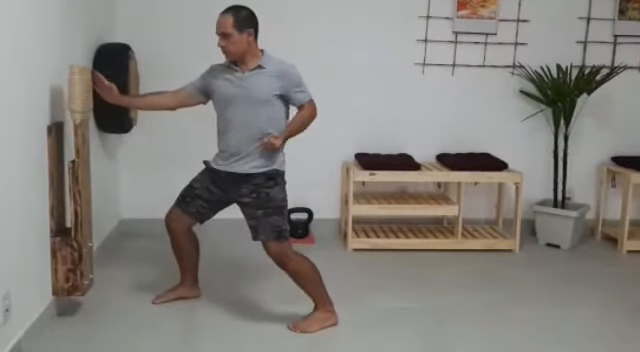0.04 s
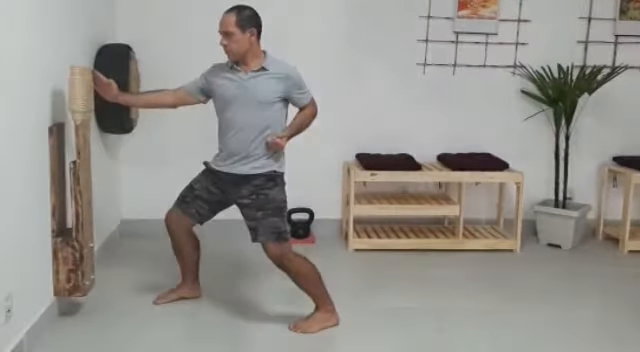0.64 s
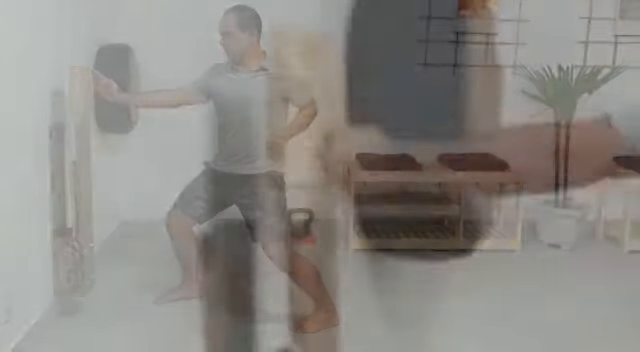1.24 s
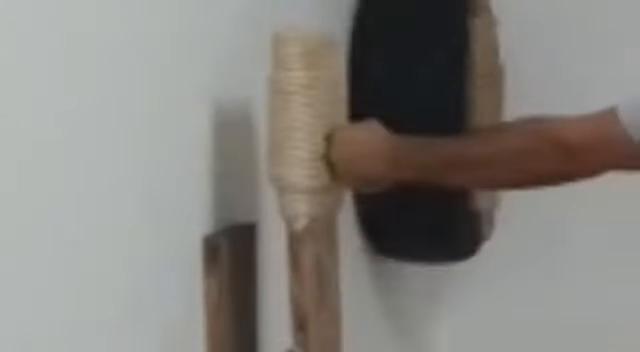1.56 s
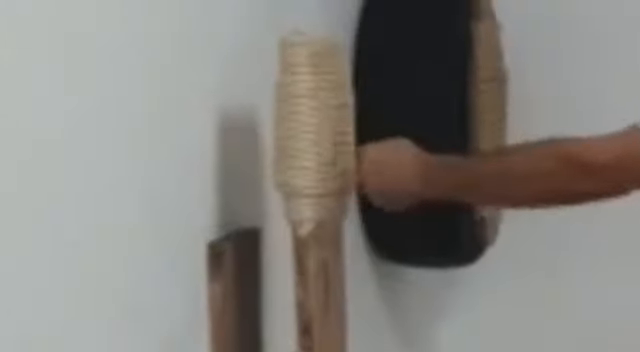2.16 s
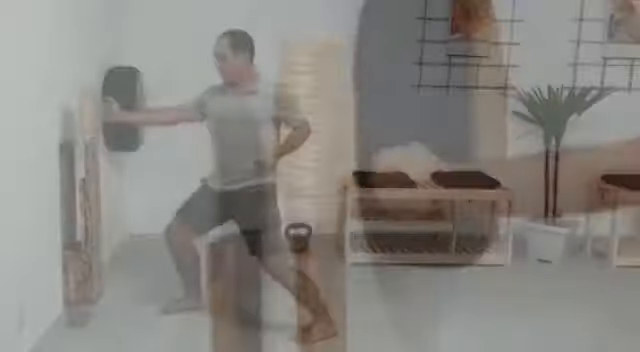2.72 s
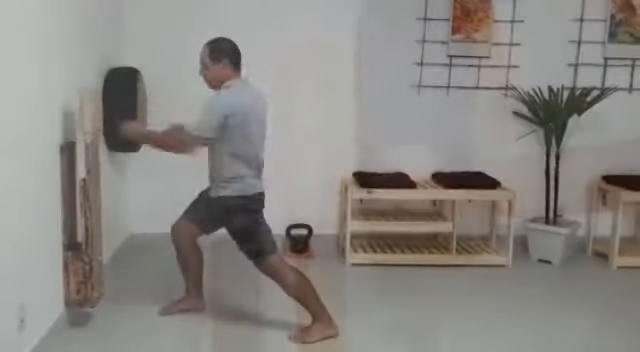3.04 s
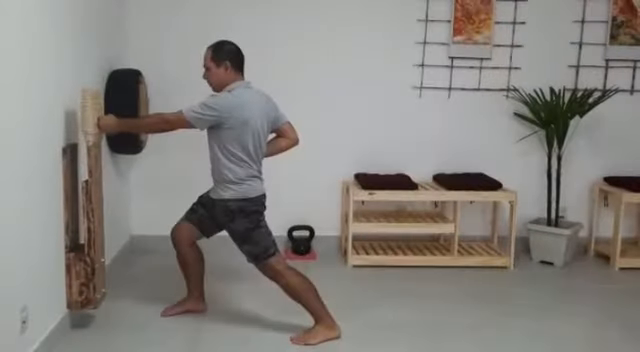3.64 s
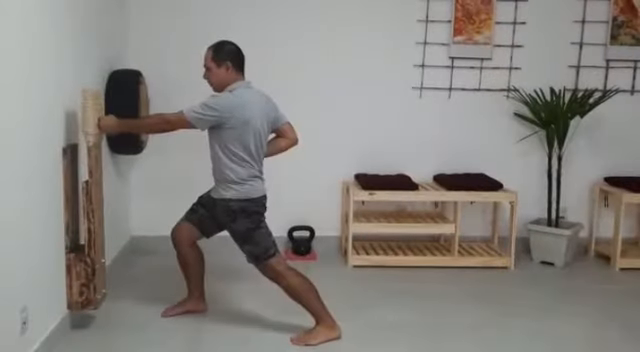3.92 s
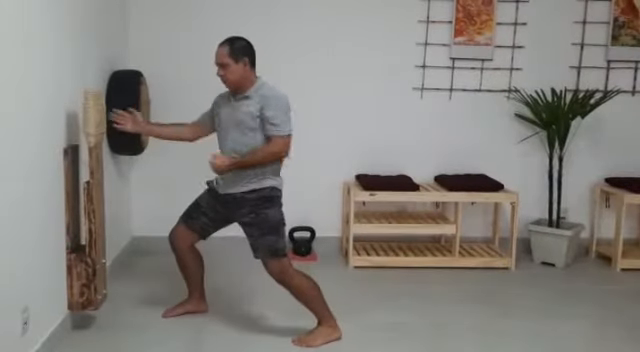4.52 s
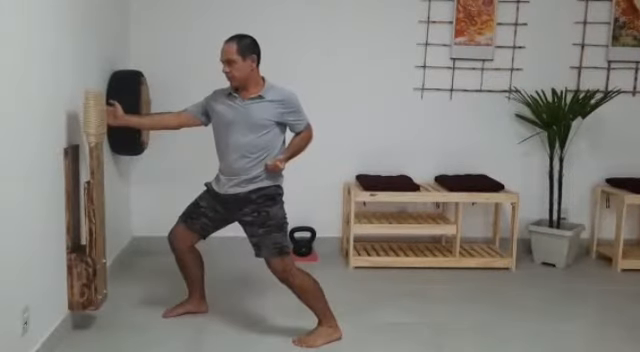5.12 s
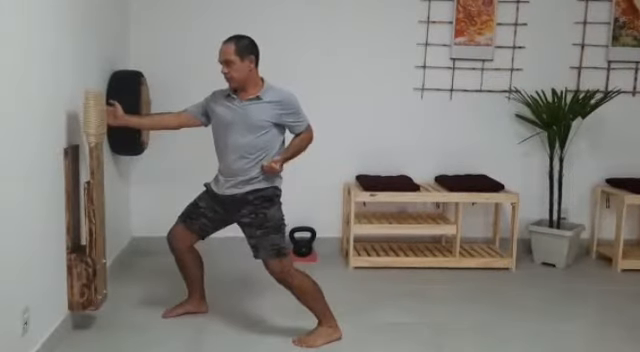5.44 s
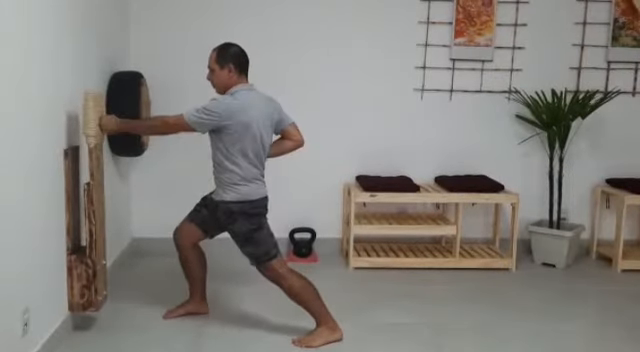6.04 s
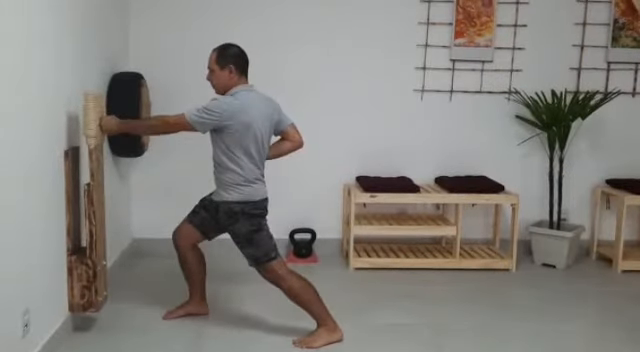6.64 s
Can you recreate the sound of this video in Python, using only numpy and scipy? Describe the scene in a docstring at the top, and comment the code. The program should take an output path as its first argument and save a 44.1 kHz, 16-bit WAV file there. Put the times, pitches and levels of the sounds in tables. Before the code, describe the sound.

Over a steady indoor rumble and appliance hum, the tail of an earlier blow fades. Three separate punches land on a rope-wound wooden post, each a sharp smack and knock followed by a deep, wavering ring from the room. Between the second and third come a light pat and soft shifts of weight, with faint clothing rustle. The microphone hears it all with a wide, long echo.

```python
"""A low boom dies away in a hard, echoing room, over rustling cloth and a steady rumble and hum.
Then a bare fist strikes a rope-wound wooden post: skin slaps the rope, the wood knocks, and the low
modes of post, wall and room boom and beat. One punch is heard twice, first as a replay that fades in
and out, then in its place. A light pat of the palm and soft shifts of weight precede the last punch."""
import sys
import numpy as np
from scipy import signal
from scipy.fft import rfft, irfft, next_fast_len
from scipy.io import wavfile

SR = 44100
rng = np.random.default_rng(int(sys.argv[2]) if len(sys.argv) > 2 else 0)


def transcribe(u):
    """Save the signal u as a 16-bit wav file named by the first command-line argument.

    u: samples, shape (n,) or (channels, n), limited to [-1, 1]; the rate is SR.
    q: integer samples, one column per channel.
    """
    v = np.clip(np.atleast_2d(u).T, -1, 1)
    q = np.round(v * 32767).astype(np.int16)
    wavfile.write(sys.argv[1], SR, q)


N = 298557

# the two microphone ports: frequency_hz, side_minus_mid_db, left_minus_right_db
PORT_RESPONSE = [(100, -17, 0), (300, -14, .6), (560, -7, 3), (1190, 0, 1.5), (2130, 1, 5),
                 (4200, -1, -0.5), (8000, 0.5, -4.5), (12000, -1, 2)]
# how long the echoing tail takes to fade in each band: frequency_hz, t60_s
TAIL_FADE_TIMES = [(150, 3.38), (300, 3.11), (750, 1.81), (2000, 2.61), (5000, 1.59), (8500, 1.25),
                   (12000, 0.63)]
# spectrum of rumble and air noise: frequency_hz, relative_db
RUMBLE_SPECTRUM = [(20, -34.5), (42, -11), (75, -8.5), (97, -12), (140, -0.5), (220, -4), (310, 0),
                   (440, -11.5), (700, -18.5), (1250, -19.5), (1650, -24), (2100, -22.5), (2600, -30),
                   (3200, -34.8), (5000, -45.5), (7500, -47.3), (11000, -72.5)]
# resonances in the rumble: centre_hz, half_width_hz, relative_db
WHINE_PEAKS = [(76, 4, -9), (305, 10, -3), (530, 10, -14), (1230, 30, -23), (1985, 70, -21),
               (3850, 90, -36), (4550, 70, -37)]
# tones of appliances: pitch_hz, level_db
HUM_TONES = [(196, -53), (218, -57), (240, -55), (300, -50), (530, -62), (1320, -67), (1440, -70)]
# envelope of the motor's harmonics: frequency_hz, level_db
MOTOR_SPECTRUM = [(2200, -76), (2600, -88), (2920, -79), (3400, -88), (3850, -79), (4200, -89), (4560, -81),
                  (5000, -96), (6800, -96), (8000, -104)]
# spectrum of rubbing cloth: frequency_hz, relative_db
CLOTH_SPECTRUM = [(300, 0), (800, 7), (2000, -10), (3500, -3.5), (6000, -4.5), (8500, -7.5), (10000, -14),
                  (12000, -19), (15000, -41.5)]
# arm movements: peak_s, level_db, swell_s, fall_s
ARM_MOVES = [(0, -62, .1, 0.63), (2.97, -61.5, 0.18, .15), (4.69, -62.5, 0.11, .26),
             (5.75, -63.5, 0.13, 0.11)]
# shifts of the body's weight: start_s, pitch_hz, level_db
WEIGHT_SHIFTS = [(0.01, 56, -34), (0.22, 56, -33), (4.73, 78, -41), (5.47, 140, -39)]
# spectrum of the palm's pat: frequency_hz, relative_db
TAP_SPECTRUM = [(300, -10), (700, -8), (1100, -1), (1500, -4), (2000, 0), (2700, 0), (3200, -19),
                (8000, -27), (14000, -48)]
# low modes of post, wall and room: pitch_hz, relative_db, t60_s
BOOM_MODES = [(38.3, -34.2, 0.8), (44.3, -33.5, 3.0), (52.0, -44.7, 1.3), (63.3, -39.1, 1.6),
              (74.8, -28.1, 1.5), (81.8, -39.5, 1.7), (91.2, -39.5, 2.5), (106.0, -33.9, 1.5),
              (109.0, -47.0, 1.4), (120.9, -28.1, 2.0), (124.9, -16.5, 0.5), (131.4, -16.2, 1.1),
              (129.2, -29.8, 3.7), (135.1, -27.5, 3.8), (148.0, -31.0, 0.7), (149.5, -38.1, 3.8),
              (155.7, -31.0, 1.6), (168.8, -41.0, 3.8), (199, -37, 2.8), (220, -38, 2.8), (240, -40, 2.8)]
# dense room resonances under the arm's weight: frequency_hz, relative_db
THUD_SPECTRUM = [(145, -20), (168, 3.5), (200, 2), (235, -2.5), (300, 0), (370, -8), (440, -8),
                 (540, -13.5), (700, -21), (1500, -54)]
# tones left in the room by a knock: pitch_hz, relative_db
RING_CLUSTERS = [(555, 0), (680, -4), (825, -2), (918, -1), (988, -2), (1058, 1.5), (1135, -1), (1257, 0),
                 (1412, -4), (1525, -4), (1612, -3), (1715, -2), (1780, -7), (1873, -4), (2075, -8),
                 (2298, -3), (2442, -1.5), (2530, -6), (2610, -7)]
# spectrum of skin on rope: frequency_hz, relative_db
SLAP_SPECTRUM = [(300, -14), (450, -9), (610, -0.5), (740, -3.5), (1170, 5.3), (1450, 0), (2000, -1.5),
                 (2700, -1.3), (3150, -12), (3650, -15.8), (4400, -22.8), (6500, -22.7), (9000, -29),
                 (10200, -42.5), (11500, -31), (13500, -33), (15000, -54)]
# punches: start_s, thud_gain_db, boom_gain_db, boom_tilt_db_per_octave, knock_gain_db, upper_gain_db,
# slap_gain_db, slap_treble_db, lower_knock_hz, upper_knock_hz, slap_pitch_ratio
PUNCHES = [(-.65, -4.5, -8, -2, 1.5, 0, -2, 0, 950, 1650, 1.0),
           (3.0735, 0, 0.6, -0.2, 0, 1.3, 1.3, 0.2, 915, 1740, 1.01),
           (5.8118, 1.3, 1, -2.4, 0, 5.0, 3.1, 0.6, 990, 1520, .96)]

STRIKE_SAMPLES, KNOCK_RISE_S = 3 * SR, .0013
LOWER_HALF_WIDTH_HZ, UPPER_HALF_WIDTH_HZ = 205, 190


def undb(db):
    """Amplitude grows tenfold for every 20 dB."""
    return 10 ** (np.asarray(db) / 20)


def along(table, hz, column=1):
    """Interpolation on a logarithmic frequency axis."""
    rows = np.array(table)
    return np.interp(np.log(hz + 1e-9), np.log(rows[:, 0]), rows[:, column])


def fade(t, t60_s):
    """Exponential damping: 60 dB are lost in t60_s."""
    return np.exp(-np.log(1000) * t / t60_s)


def rise(t, rise_s):
    """Finite contact time: the vibration builds up smoothly."""
    return 1 - np.exp(-(t / rise_s) ** 2)


def resonance(hz, centre_hz, half_width_hz):
    """A damped resonator responds in a bell-shaped peak about its centre."""
    return 1 / (1 + ((hz - centre_hz) / half_width_hz) ** 2)


def scatter(size, count=1):
    """Multipath propagation: echoes arrive with random phases, as mid and side pairs."""
    return np.exp(2j * np.pi * rng.random((count, 2, size // 2 + 1)))


def disturb(paths, one_radian_hz=1000):
    """A change of stance alters the echo paths, shifting the phase of short waves most."""
    hz = np.linspace(0, SR / 2, paths.shape[-1])
    return paths * np.exp(1j * np.sqrt(hz / one_radian_hz) * rng.standard_normal(paths.shape))


def diffuse(colour, size, paths=None):
    """Diffuse field of rms 1 and spectral shape colour(hz); long waves reach both ports nearly alike."""
    hz = np.fft.rfftfreq(size, 1 / SR)
    mid, side = scatter(size)[0] if paths is None else paths
    sign = np.array([[1], [-1]])
    spread = undb(along(PORT_RESPONSE, hz))
    lean = undb(sign * along(PORT_RESPONSE, hz, column=2) / 2)
    ports = (mid + sign * spread * side) / np.hypot(1, spread)
    noise = irfft(ports * lean * colour(hz), size)
    return noise / np.std(noise)


def echoing_tail(noise, t):
    """Frequency-dependent decay: each band of the echoing tail fades at its own rate."""
    hz, spectrum = np.fft.rfftfreq(len(t), 1 / SR), rfft(noise)
    centres, t60s = np.transpose(TAIL_FADE_TIMES)
    bands = (np.interp(np.log(hz + 1), np.log(centres), row) for row in np.eye(len(centres)))
    return sum(irfft(spectrum * band, len(t)) * fade(t, t60) for band, t60 in zip(bands, t60s))


def burst(colour, t, paths, rise_s, direct_db, direct_t60_s, delay_s=0):
    """Superposition of the echoing tail and a brief direct sound, direct_db relative to it."""
    noise = diffuse(colour, len(t), paths)
    direct = noise * undb(direct_db) * fade(t, direct_t60_s)
    return rise(np.maximum(t - delay_s, 0), rise_s) * (echoing_tail(noise, t) + direct)


def struck_mode(t, hz, level_db, t60_s, delay_s=0, right_lag_s=0):
    """Free vibration heard directly: a damped sine that may reach the right port later."""
    age = np.maximum(t - delay_s - right_lag_s * np.array([[0], [1]]), 0)
    return undb(level_db) * np.sin(2 * np.pi * hz * age) * fade(age, t60_s) * rise(age, KNOCK_RISE_S)


def rumble(level_db, waver_db):
    """Broadband room noise under slight random amplitude modulation."""
    knots = rng.standard_normal(40)
    waver = np.interp(np.arange(N), np.linspace(0, N, len(knots)), knots)
    noise = diffuse(lambda hz: undb(along(RUMBLE_SPECTRUM, hz)), next_fast_len(N + 1) * 2)[:, :N]
    return noise * undb(level_db + waver_db * waver)


def whine(level_db):
    """Resonances pick steady bands out of noise, as of a distant fan."""
    def colour(hz):
        return sum(undb(db) * resonance(hz, centre, width) for centre, width, db in WHINE_PEAKS)
    return undb(level_db) * diffuse(colour, next_fast_len(N))[:, :N]


def hum(shaft_hz, uneven_db):
    """Periodic motion gives a line spectrum: appliance tones and high harmonics of a motor's shaft."""
    harmonics = shaft_hz * np.arange(MOTOR_SPECTRUM[0][0] // shaft_hz, MOTOR_SPECTRUM[-1][0] // shaft_hz)
    motor_db = along(MOTOR_SPECTRUM, harmonics) + uneven_db * rng.standard_normal((2, len(harmonics)))
    hum_hz, hum_db = np.transpose(HUM_TONES)
    hz = np.r_[hum_hz, harmonics]
    levels_db = np.hstack([np.tile(hum_db, (2, 1)), motor_db])
    port_spread = np.minimum(undb(along(PORT_RESPONSE, hz)), 1) ** 2
    phase_turns = rng.random(len(hz)) + port_spread * rng.random((2, len(hz)))
    size = next_fast_len(N)
    lines = np.zeros((2, size // 2 + 1), complex)
    lines[:, np.rint(hz * size / SR).astype(int)] = undb(levels_db) * np.exp(2j * np.pi * phase_turns)
    return irfft(lines, size)[:, :N] * size / np.sqrt(2)


def clothes():
    """Friction noise: the hiss of cloth follows the speed of the arms."""
    t = np.arange(N) / SR
    speed = sum(undb(db) * np.exp(-((t - peak_s) / np.where(t < peak_s, swell_s, fall_s)) ** 2 / 2)
                for peak_s, db, swell_s, fall_s in ARM_MOVES)
    return speed * diffuse(lambda hz: undb(along(CLOTH_SPECTRUM, hz)), next_fast_len(N))[:, :N]


def bump(hz, level_db):
    """A slow push on the floor excites one low mode, in phase at both ports."""
    t = np.arange(SR) / SR
    swell = rise(t, rise_s=.025) * fade(t, t60_s=.35)
    return np.tile(undb(level_db) * swell * np.sin(2 * np.pi * hz * t), (2, 1))


def tap():
    """Brief contact gives a wide spectrum: the palm pats the rope with a bright tick."""
    t = np.arange(STRIKE_SAMPLES) / SR
    return undb(-52) * burst(lambda hz: undb(along(TAP_SPECTRUM, hz)), t, paths=None,
                             rise_s=.001, direct_db=8, direct_t60_s=.09)


def boom(t, gain_db, tilt_db_per_octave, hold_s=1.17):
    """Interference: neighbouring low modes start in antiphase, so their sum swells and then beats."""
    ports = 1 + .1 * rng.standard_normal(len(BOOM_MODES)) * np.array([[1], [-1]])
    octaves = np.log2(np.array(BOOM_MODES)[:, 0] / 50)
    weights = ports * undb(tilt_db_per_octave * octaves)  # a softer landing favours the deepest modes
    modes = [(-1) ** k * undb(db) * np.sin(2 * np.pi * hz * t) * fade(t, t60_s)
             for k, (hz, db, t60_s) in enumerate(BOOM_MODES)]
    linger = (1 + t ** 2) * np.exp(-(t / hold_s) ** 6)
    return undb(gain_db) * linger * (weights @ np.array(modes))


def thud(t, paths, delay_s=.0075):
    """Momentum transfer: the arm's weight lands after first touch and drives dense room modes."""
    dense = burst(lambda hz: undb(along(THUD_SPECTRUM, hz)), t, paths,
                  rise_s=.0035, direct_db=0, direct_t60_s=.12, delay_s=delay_s)
    return undb(-24.6) * dense + struck_mode(t, hz=190, level_db=-14.5, t60_s=.08, delay_s=delay_s)


def ring(t, paths, upper_hz, width_hz=9):
    """Close resonances beat in lingering clusters, stronger near the wood's upper resonance."""
    def colour(hz):
        clusters = sum(undb(db) * np.exp(-((hz - centre) / width_hz) ** 2) for centre, db in RING_CLUSTERS)
        return clusters * (1 + 1.2 * resonance(hz, upper_hz, UPPER_HALF_WIDTH_HZ))
    onset = 1 - np.exp(-t / .015)
    return undb(-33) * diffuse(colour, len(t), paths) * fade(t, t60_s=2.1) * onset


def lower_knock(t, paths, centre_hz):
    """Impulse response of the post's lower resonance: a few clean cycles, then an echoing tail."""
    band = burst(lambda hz: resonance(hz, centre_hz, LOWER_HALF_WIDTH_HZ), t, paths,
                 rise_s=KNOCK_RISE_S, direct_db=11, direct_t60_s=.11)
    clack = struck_mode(t, centre_hz, level_db=-23.5, t60_s=.045, right_lag_s=.00012)
    return undb(-40.4) * band + clack


def upper_knock(t, paths, centre_hz):
    """The post's upper damped resonance; its pitch depends on where the fist lands."""
    return undb(-40) * burst(lambda hz: resonance(hz, centre_hz, UPPER_HALF_WIDTH_HZ), t, paths,
                             rise_s=.003, direct_db=0, direct_t60_s=.4)


def slap(t, paths, pitch_ratio, treble_db, treble_hz=3200):
    """Abrupt contact of skin on rope radiates a broadband crack."""
    def colour(hz):
        shelf_db = treble_db * (1 - np.exp(-(hz / treble_hz) ** 4))
        return undb(along(SLAP_SPECTRUM, hz / pitch_ratio) + shelf_db)
    return undb(-31.4) * burst(colour, t, paths, rise_s=.0014, direct_db=-8, direct_t60_s=.05)


def punch(room, thud_db, boom_db, tilt_db, knock_db, upper_db, slap_db, treble_db,
          lower_hz, upper_hz, slap_ratio):
    """Impact excitation: one blow drives rope, wood and room, and their responses add."""
    t = np.arange(STRIKE_SAMPLES) / SR
    slap_paths, lower_paths, upper_paths, ring_paths, thud_paths = disturb(room)
    crack = undb(slap_db) * slap(t, slap_paths, slap_ratio, treble_db)
    upper = undb(upper_db) * upper_knock(t, upper_paths, upper_hz)
    knock = undb(knock_db) * (lower_knock(t, lower_paths, lower_hz) + ring(t, ring_paths, upper_hz))
    bass = undb(thud_db) * thud(t, thud_paths) + boom(t, boom_db, tilt_db)
    wall_swell = undb(1.5 * np.exp(-((t - .09) / .025) ** 2))  # the far wall's reflection, 90 ms later
    tail_fade = np.exp(-(t / 1.35) ** 4)  # the decay steepens as the tail ages
    return (wall_swell * (crack + upper) + knock + bass) * tail_fade


def add(out, sound, at_s):
    """Linear superposition at a given time; what falls outside the scene is dropped."""
    start = int(at_s * SR)
    first, last = max(start, 0), min(start + sound.shape[1], N)
    out[:, first:last] += sound[:, first - start:last - start]


def replay(mix, from_s, to_s, lead_s, fade_s):
    """Time shift: one stretch also plays ahead of its place, with a fade to silence at both joins."""
    first, last, lead = (int(s * SR) for s in (from_s, to_s, lead_s))
    joined = np.hstack([mix[:, :first], mix[:, first + lead:last + lead], mix[:, last:]])
    from_join_s = np.minimum(abs(np.arange(N) - first), abs(np.arange(N) - last)) / SR
    return joined * np.minimum(from_join_s / fade_s, 1) ** .93


def scene():
    """Sound pressures add: background, body movements and punches, the first already dying away."""
    out = rumble(level_db=-37.7, waver_db=.4) + whine(level_db=-50)
    out += hum(shaft_hz=58.42, uneven_db=2.5) + clothes()
    # post and microphone stand still, so the punches share their low echoes
    room = scatter(STRIKE_SAMPLES, count=5)
    for start_s, *blow in PUNCHES:
        add(out, punch(room, *blow), start_s)
    add(out, tap(), at_s=4.677)
    for start_s, pitch_hz, level_db in WEIGHT_SHIFTS:
        add(out, bump(pitch_hz, level_db), start_s)
    return replay(out, from_s=.585, to_s=2.238, lead_s=1.8852, fade_s=.585)


def record(dry):
    """Band limiting: the recorder cuts the deepest bass and the highest treble."""
    high_pass = signal.butter(2, 16, "high", fs=SR, output="sos")
    low_pass = signal.ellip(8, .2, 70, 15000, fs=SR, output="sos")
    return signal.sosfilt(low_pass, signal.sosfilt(high_pass, dry))


dry = scene()
out = record(dry)
transcribe(out)
```